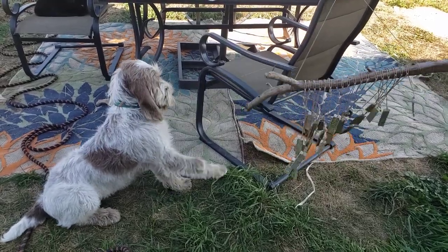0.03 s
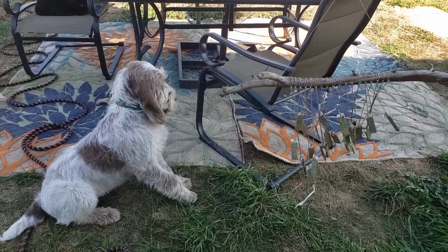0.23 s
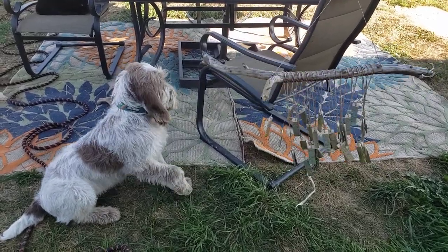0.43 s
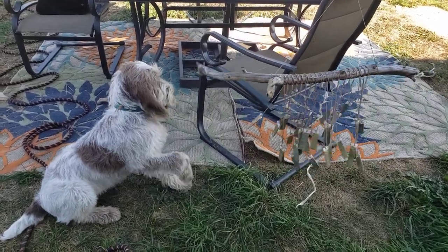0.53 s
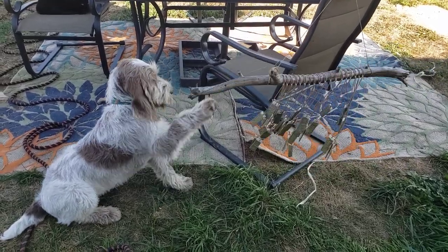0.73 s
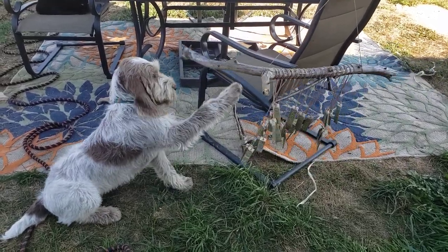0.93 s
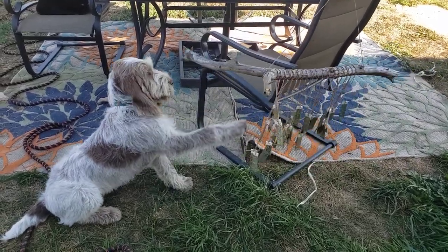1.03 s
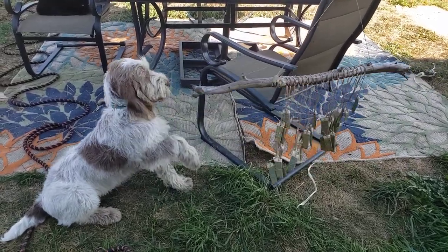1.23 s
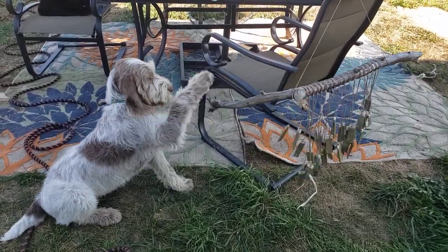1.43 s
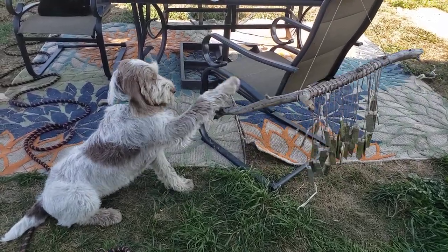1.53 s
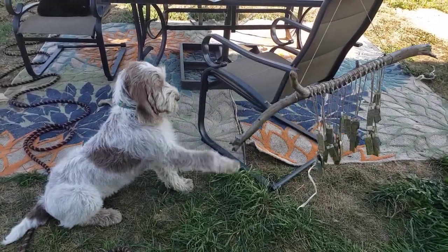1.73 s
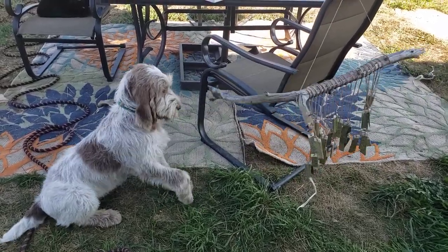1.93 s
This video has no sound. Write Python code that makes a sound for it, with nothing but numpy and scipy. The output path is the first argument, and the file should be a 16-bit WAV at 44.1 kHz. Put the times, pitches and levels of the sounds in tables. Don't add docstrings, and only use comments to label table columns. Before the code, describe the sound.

Small metal pieces jangle together as a puppy bats the chime: sparse ticks first, then crowded sharp clinks, a second flurry, and a fading tinkle. Close, dry outdoor pickup with short reflections and faint air.

```python
import sys
import numpy as np
from scipy import signal
from scipy.io import wavfile
from scipy.ndimage import uniform_filter1d

SR = 44100
rng = np.random.default_rng(int(sys.argv[2]) if len(sys.argv) > 2 else 0)


def bounce(signal):
    frames = np.transpose(np.atleast_2d(signal))
    limited = np.clip(frames, -1, 1)
    pcm = np.round(limited * 32767).astype(np.int16)
    wavfile.write(sys.argv[1], SR, pcm)


def invert_db(level):
    return 10 ** (np.asarray(level, dtype=float) / 20)


N = 88200


def drift(rate_hz):
    r = np.exp(-2 * np.pi * rate_hz / SR)
    settle = 9000
    slow = signal.lfilter([1], [1, -2 * r, r * r], rng.standard_normal(N + settle))[settle:]
    return (slow - slow.mean()) / slow.std()


def butter(x, order, hz, kind):
    return signal.sosfilt(signal.butter(order, hz, kind, fs=SR, output="sos"), x)


def left_right(db):
    return invert_db(np.array([[db], [-db]]) / 2)


def decay(kicks, fade_s):
    return signal.lfilter([1], [1, -np.exp(-1 / (fade_s * SR))], kicks)


def breadth(db):
    typical_db = -25
    over = np.asarray(db) - typical_db
    return typical_db + np.where(over > 0, 0.5, 0.72) * over


def agitation_db():
    settle_s, breeze_db = 0.026, -34
    kicks, rows = np.zeros(N), np.transpose(EARLY + LATE)
    kicks[(rows[0] * SR).astype(int)] = invert_db(breadth(rows[1]))
    return 20 * np.log10(decay(kicks, settle_s) + invert_db(breeze_db))


# frequency in Hz, level in dB.
AIR = [(25, -33), (55, -4.5), (110, -17.5), (1000, -35), (1700, -30), (2500, -15), (16000, -11)]


def air():
    level_db, follows, patchy_db, patch_hz, pan_db = -42.5, 1, 7, 22.4, 2
    out, white = 0, rng.standard_normal((2, 2, N))
    edges_hz = 25 * 2 ** np.arange(0, 9.6, 0.5)
    air_hz, air_db = np.transpose(AIR)
    for k, (low, high) in enumerate(zip(edges_hz, edges_hz[1:])):
        band = butter(white[k % 2], 2, [low, high], "band")
        db = np.interp(np.log(low * high) / 2, np.log(air_hz), air_db)
        right_loss_db = np.array([[0], [900 / low]])
        out = out + invert_db(db + patchy_db * drift(patch_hz) - right_loss_db) * band
    follow = uniform_filter1d(agitation_db(), size=800)
    gain = invert_db(level_db + follows * (follow - follow.mean()))
    return gain * out * left_right(pan_db)


# start in seconds, peak in dB, width in seconds.
BUMPS = [
    (0.474, -24.5, 0.0024),
    (0.52, -36.5, 0.0025),
    (0.774, -50, 0.0042),
    (0.85, -39, 0.0044),
    (0.865, -39.5, 0.0022),
    (0.944, -40.5, 0.0011),
    (1.286, -35, 0.0022),
    (1.587, -41, 0.0016),
]


def bumps(chime):
    low_cut_hz, strain_db = 35.5, -27
    t = np.arange(N) / SR
    push = np.zeros(N)
    for s, db, width in BUMPS:
        push -= invert_db(db) * np.exp(-np.abs(t - s - width / 2) / (0.49 * width))
    power = butter(chime[0], 8, 12500, "low") ** 2
    push -= invert_db(strain_db) * butter(power, 2, 300, "low")
    return butter(push, 4, low_cut_hz, "high") * np.array([[1], [0]])


# start in seconds, peak in dB.
KNOCKS = [
    (0.045, -67.5),
    (.155, -55.5),
    (0.998, -65.5),
]
# frequency in Hz, level in dB, T60 in seconds.
SEAT = [(194, -6, .45), (350, -4, .29), (452, -4, .15), (538, -9, .3), (732, -5, .4), (1250, -6, .07)]


def seat():
    thud_db, thud_t60_s, waver_db, waver_hz, pan_db = 15.5, 0.28, 5.0, 47, 5
    out, t = np.zeros((2, N)), np.arange(N) / SR
    thud = butter(rng.standard_normal((2, N)), 2, [150, 1300], "band")
    for s, db in KNOCKS:
        since = np.maximum(t - s, 0)
        out += invert_db(db + thud_db - 60 * since / thud_t60_s) * (t > s) * thud
        for hz, level, t60 in SEAT:
            mode_db = db + level + waver_db * drift(waver_hz) - 60 * since / t60
            out += invert_db(mode_db) * np.sin(2 * np.pi * hz * since)
    return out * left_right(pan_db)


def echoes(x):
    level_db, t60_s, first_s, length_s = -18, 0.14, 0.002, 0.12
    t = np.arange(int(length_s * SR)) / SR
    tail = rng.standard_normal((2, len(t))) * invert_db(-60 * t / t60_s) * (t > first_s)
    tail = tail / np.sqrt(np.sum(tail ** 2, axis=1, keepdims=True))
    return invert_db(level_db) * signal.fftconvolve(x, tail, axes=1)[:, :N]


LEFT_LAG_S = 0.00018


def cracks(s, db):
    tick_db, tick_s, sizzle_db, sizzle_s, low_hz, pan_db = -3.5, 0.0017, -11, 0.0037, 2075, 4.5
    clicks, noise = np.zeros(N), rng.standard_normal((3, N))
    np.add.at(clicks, (np.asarray(s) * SR).astype(int), invert_db(db))
    clicks += 1e-18
    tick = invert_db(tick_db) * decay(clicks, tick_s) * noise[0]
    sizzle = invert_db(sizzle_db) * decay(clicks, sizzle_s) * noise[1:]
    both = np.array([np.roll(tick, int(LEFT_LAG_S * SR)), tick]) + sizzle
    return butter(both, 5, low_hz, "high") * left_right(pan_db)


def lasting(hz):
    return 1 + 1.8 * np.exp(-((hz - 5350) / 600) ** 2)


# frequency in Hz, left over right in dB.
LEFTWARD = [(2400, 11), (4400, 1), (8000, 4), (15000, 8)]


def add(out, s, db, hz, length_s, luck):
    attack_s, damp_shape, tail_db = 0.0004, 1.6, -24
    pan_spread_db, lag_spread_s, wobble_hz, wobble = 4, 0.00008, 86.8, 1
    tail_t60_s = 0.2 * lasting(hz)
    i = int(s * SR)
    n = min(int((length_s + 0.77 * tail_t60_s) * SR), N - i)
    pan_db = np.interp(hz, *np.transpose(LEFTWARD)) + pan_spread_db * luck[0]
    lag_s = LEFT_LAG_S + lag_spread_s * luck[1]
    t = np.arange(n) / SR - np.array([[lag_s], [0]])
    body = np.clip(1 - t / length_s, 0, 1) ** damp_shape + invert_db(tail_db - 60 * t / tail_t60_s)
    rise = np.clip(t / attack_s, 0, 1)
    beat = 1 + wobble * np.sin(2 * np.pi * wobble_hz * luck[2] * t[1])
    tone = np.sin(2 * np.pi * hz * t + 3 * luck[2])
    out[:, i:i + n] += invert_db(db) * left_right(pan_db) * rise * beat * body * tone


MODES_HZ = [2330, 2710, 2950, 3140, 3520, 4820, 5110, 5400, 5750, 6190, 7300, 7410, 7810, 8450, 8910, 9380,
            9700, 10040, 10330, 10760, 10950, 11170, 11430, 12800, 13300, 14000, 14500, 15030, 15300]
# frequency in Hz, level in dB.
RADIATION = [(2200, -12.5), (4000, -20.5), (7000, -7.5), (11000, -5), (16000, -8)]


def any_mode(pick, luck):
    hz = MODES_HZ[int(pick * len(MODES_HZ))] * (1 + 0.00367 * luck)
    return hz, np.interp(hz, *np.transpose(RADIATION))


def touches():
    per_s, ring_s, level_db, spread_db, most = 240, 0.019, -19.5, 3, 900
    out, draw = np.zeros((2, N)), rng.random((most, 6))
    times = np.cumsum(-np.log(1 - draw[:, 0])) / per_s
    luck = np.clip(rng.standard_normal((most, 4, 6)), -1.5, 1.5)
    keep = times < (N - 100) / SR
    shaking_db = agitation_db()[np.minimum(times * SR, N - 1).astype(int)]
    levels = shaking_db + level_db - spread_db * np.log(1 - 0.95 * draw[:, 1])
    for s, db, picks, rows in zip(times[keep], levels[keep], draw[keep], luck[keep]):
        for pick, row in zip(picks[2:], rows):
            hz, mode_db = any_mode(pick, row[4])
            length_s = ring_s * invert_db(4.85 * row[3]) * np.sqrt(8000 / hz) * lasting(hz)
            add(out, s, db + mode_db + 3 * row[5], hz, length_s, row)
    return out + cracks(times[keep], levels[keep])


# start in seconds, peak in dB, loudest mode in Hz, length in seconds.
EARLY = [(0.102, -35, 10670, 0.016), (0.127, -34, 10760, 0.037), (0.184, -29, 9450, 0.015),
         (0.22, -35, 7230, 0.019), (0.23, -16, 11280, 0.023), (0.27, -22, 9450, 0.009),
         (0.278, -25, 11440, 0.028), (0.335, -28, 11280, 0.02), (0.34, -26, 10960, 0.021),
         (0.379, -31, 7320, 0.03), (0.385, -26, 11260, 0.011), (0.398, -32, 11180, 0.036),
         (0.412, -34, 9440, 0.008), (0.43, -21, 14570, 0.018), (0.436, -17, 15300, 0.018),
         (0.451, -22, 7400, 0.026), (0.475, -17, 10940, 0.025), (0.481, -15, 15030, 0.019),
         (0.502, -20, 11040, 0.01), (0.52, -23, 11190, 0.037), (0.535, -32, 15280, 0.018),
         (0.547, -24, 10920, 0.029), (0.572, -29, 10940, 0.032), (0.597, -26, 14550, 0.015),
         (0.634, -12, 15030, 0.019), (0.659, -28, 10940, 0.026), (0.729, -34, 7830, 0.014),
         (0.751, -40, 10860, 0.013), (0.77, -22, 10840, 0.024), (0.811, -22, 15320, 0.016),
         (0.84, -29, 12290, 0.015), (0.846, -12, 11210, 0.008), (0.853, -26, 7570, 0.024)]
# start in seconds, peak in dB, loudest mode in Hz, length in seconds.
LATE = [(0.867, -16, 11160, 0.029), (0.895, -25, 15020, 0.014), (0.926, -23, 15500, 0.056),
        (0.943, -28, 15520, 0.038), (0.984, -33, 15300, 0.026), (1.02, -25, 15020, 0.025),
        (1.077, -31, 9770, 0.037), (1.087, -24, 10340, 0.027), (1.169, -25, 7370, 0.019),
        (1.207, -33, 13880, 0.01), (1.237, -24, 14130, 0.014), (1.243, -27, 11430, 0.016),
        (1.287, -18, 14400, 0.017), (1.321, -33, 11410, 0.018), (1.343, -32, 11140, 0.067),
        (1.364, -32, 11180, 0.04), (1.455, -27, 13330, 0.018), (1.468, -27, 12810, 0.008),
        (1.505, -22, 7330, 0.026), (1.54, -29, 11390, 0.015), (1.565, -22, 15020, 0.019),
        (1.584, -15, 11390, 0.012), (1.598, -27, 11710, 0.03), (1.616, -28, 9710, 0.031),
        (1.656, -24, 11160, 0.021), (1.722, -31, 7350, 0.013), (1.743, -30, 10970, 0.011),
        (1.787, -43, 9710, 0.018), (1.816, -34, 11160, 0.035), (1.873, -34, 13330, 0.008),
        (1.916, -43, 9720, 0.022), (1.94, -38, 9670, 0.026), (1.969, -35, 9660, 0.024),
        (1.99, -34, 9670, 0.009)]
# start in seconds, peak in dB, mode in Hz, length in seconds.
DEEP = [(0.101, -33.5, 2680, 0.0096), (0.133, -40.5, 2203, 0.063), (0.132, -37.5, 6820, 0.03),
        (0.22, -43, 5010, 0.045), (0.228, -25.5, 6160, 0.037), (0.279, -37.5, 5770, 0.032),
        (0.279, -35.5, 2900, 0.02), (0.337, -32, 2667, 0.018), (0.394, -22.5, 3590, 0.0091),
        (0.438, -39, 5350, 0.047), (0.451, -34, 2640, 0.039), (0.472, -43.5, 2673, 0.041),
        (0.483, -44, 4930, 0.033), (0.5, -31, 6900, 0.015), (0.637, -45.5, 6440, 0.011),
        (0.659, -41.5, 6200, 0.081), (0.75, -33, 6800, 0.058), (0.772, -39, 5420, 0.04),
        (0.811, -27, 3160, 0.022), (0.853, -33, 2860, 0.012), (0.873, -39.5, 5340, 0.08),
        (0.87, -25, 2710, 0.019), (0.926, -31, 6400, 0.016), (0.926, -31, 6120, 0.013),
        (0.985, -29, 6330, 0.011), (1.078, -40, 4825, 0.12), (1.091, -32, 6060, 0.012),
        (1.167, -42, 5510, 0.076), (1.24, -30.5, 2826, 0.012), (1.286, -34.5, 5750, 0.066),
        (1.302, -25.5, 6400, 0.008), (1.321, -34.5, 4750, 0.033), (1.345, -43, 5340, 0.075),
        (1.54, -40.5, 5550, 0.084), (1.565, -32.5, 6100, 0.018), (1.582, -33, 2234, 0.033),
        (1.659, -41, 5400, 0.1), (1.73, -46.5, 5570, 0.043), (1.765, -48, 2310, 0.046),
        (1.93, -48, 3455, 0.12)]
# start in seconds, peak in dB, mode in Hz, length in seconds.
BRIGHT = [(0.223, -17, 15000, 0.027), (0.392, -31, 7600, 0.063), (0.437, -24.5, 9770, 0.025),
          (0.435, -22, 11000, 0.016), (0.447, -26, 14570, 0.036), (0.451, -20, 15200, 0.024),
          (0.458, -24, 11410, 0.018), (0.482, -31, 7450, 0.042), (0.516, -28, 7350, 0.025),
          (0.773, -26, 12000, 0.028), (0.77, -28, 9170, 0.017), (0.853, -16, 11200, 0.012),
          (0.864, -25.5, 14000, 0.017), (0.905, -33.5, 10080, 0.088), (0.895, -30, 11160, 0.029),
          (0.926, -24, 11800, 0.029), (0.924, -23, 14700, 0.032), (0.932, -21, 9560, 0.013),
          (0.944, -30.5, 10930, 0.027), (0.943, -34, 15490, 0.036), (1.02, -29, 13700, 0.022),
          (1.087, -25, 14600, 0.016), (1.166, -29, 13800, 0.047), (1.288, -18.5, 11480, 0.032),
          (1.286, -18.5, 7570, 0.012), (1.508, -23.5, 11790, 0.022), (1.564, -27, 10060, 0.026),
          (1.585, -35, 9700, 0.031), (1.61, -22, 14800, 0.02), (1.654, -26.5, 14000, 0.026),
          (1.813, -34.5, 7190, 0.012)]


def clinks():
    ring_s, others_db, spread_db = 0.02, -11, 2.5
    out, rows = np.zeros((2, N)), EARLY + LATE
    for s, db, _, _ in rows:
        luck = np.clip(rng.standard_normal((8, 6)), -1.5, 1.5)
        for row, pick in zip(luck, rng.random(8)):
            hz, mode_db = any_mode(pick, row[4])
            other_db = breadth(db) + others_db + mode_db + spread_db * row[5]
            add(out, s, other_db, hz, ring_s * invert_db(2 * row[3]) * lasting(hz), row)
    for s, db, hz, length_s in rows + DEEP + BRIGHT:
        add(out, s, db, hz, length_s, rng.standard_normal(3) / [2, 3, 8])
    starts, peaks_db = np.transpose(rows)[:2]
    return out + cracks(starts, breadth(peaks_db))


def scene():
    chime = clinks() + touches()
    return chime + echoes(chime) + seat() + bumps(chime) + air()


def low_pass(x):
    return signal.sosfilt(signal.butter(12, 16820, fs=SR, output="sos"), x)


def record(dry):
    cutoff_hz = 16500
    top_cut = signal.cheby2(10, 60, cutoff_hz * 1.028, fs=SR, output="sos")
    mix = signal.sosfilt(top_cut, dry)
    return low_pass(mix)


dry = scene()
out = record(dry)
bounce(out)
```